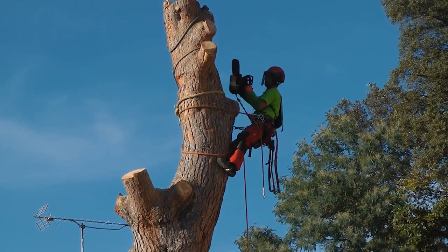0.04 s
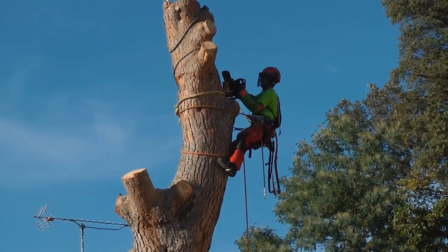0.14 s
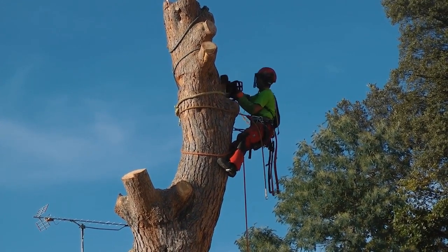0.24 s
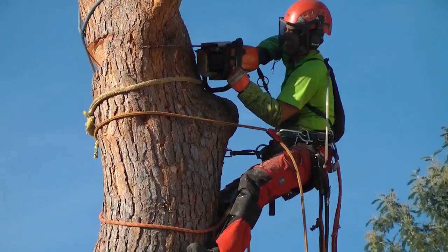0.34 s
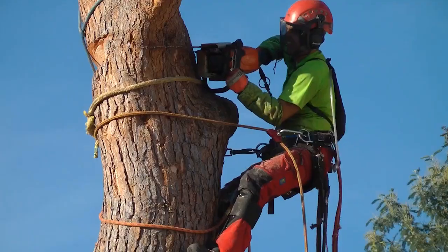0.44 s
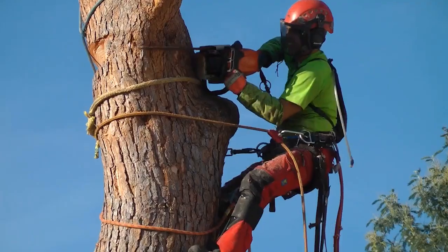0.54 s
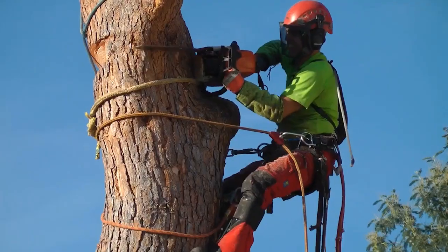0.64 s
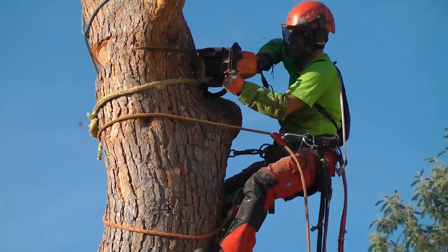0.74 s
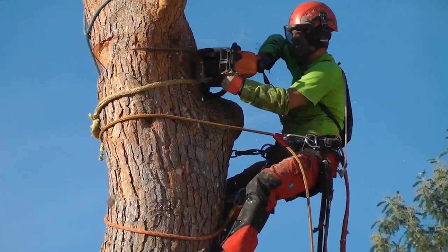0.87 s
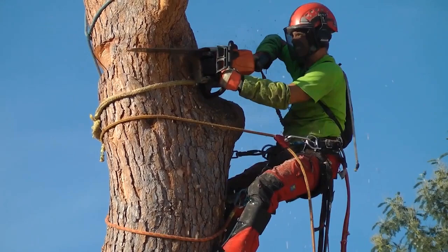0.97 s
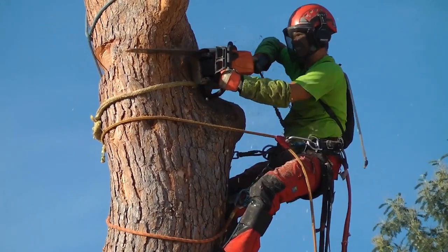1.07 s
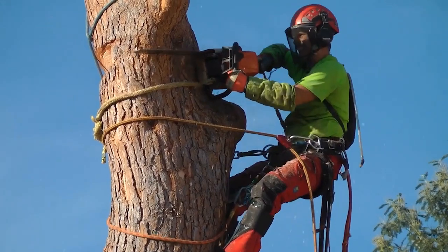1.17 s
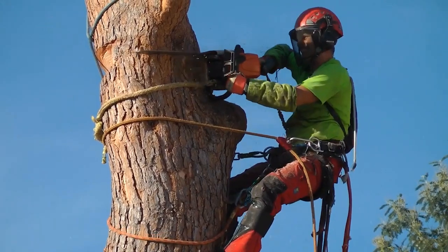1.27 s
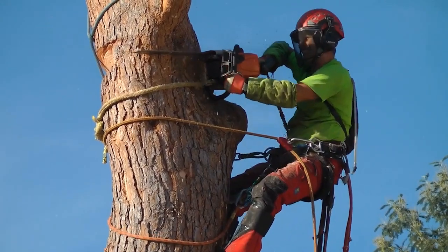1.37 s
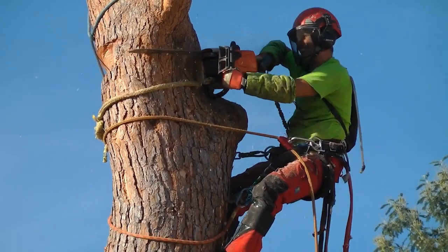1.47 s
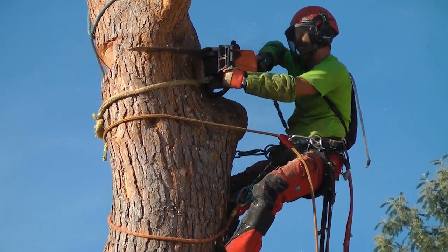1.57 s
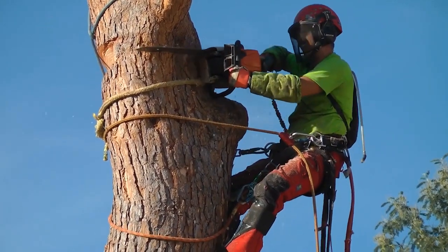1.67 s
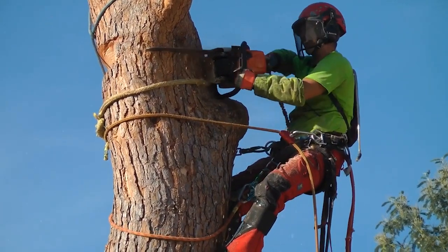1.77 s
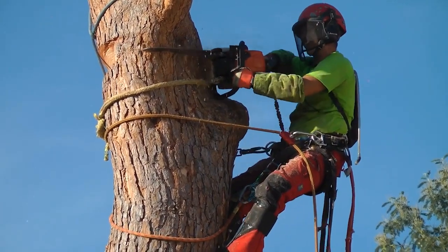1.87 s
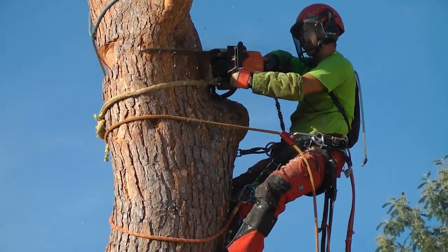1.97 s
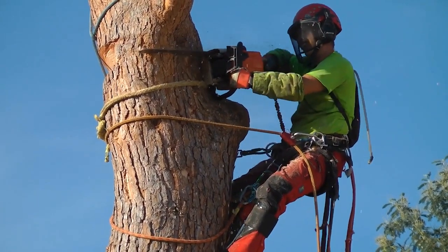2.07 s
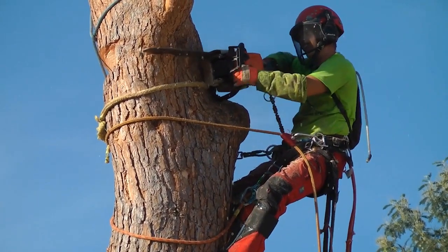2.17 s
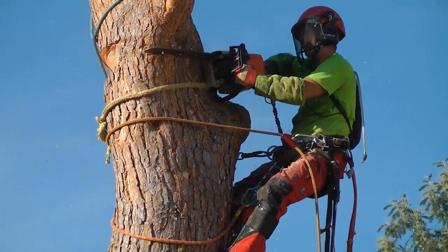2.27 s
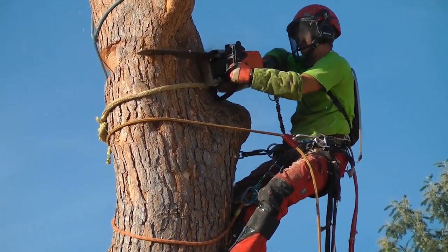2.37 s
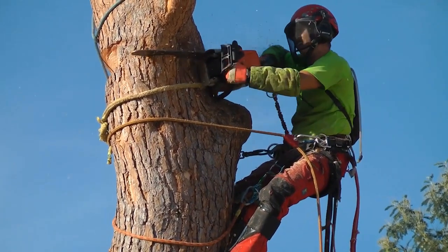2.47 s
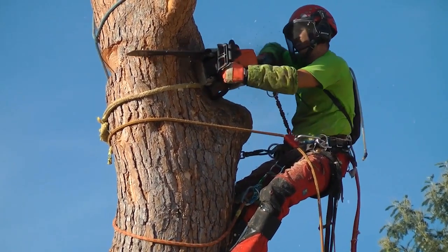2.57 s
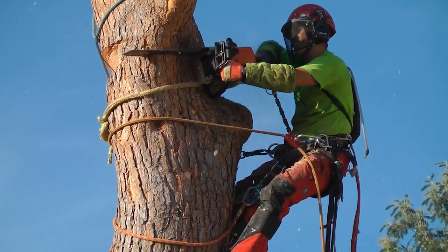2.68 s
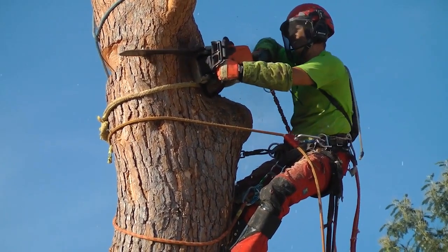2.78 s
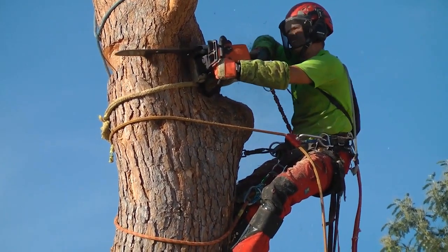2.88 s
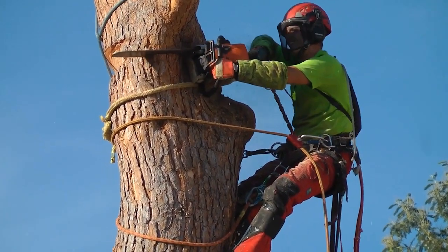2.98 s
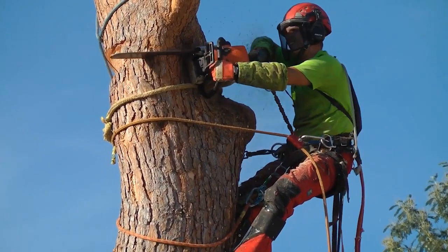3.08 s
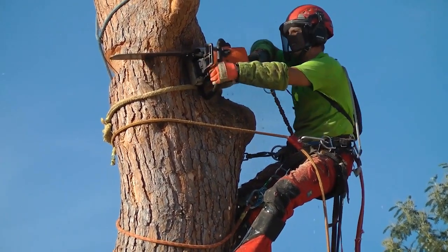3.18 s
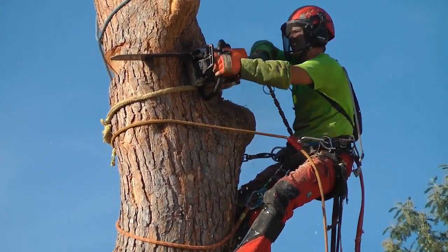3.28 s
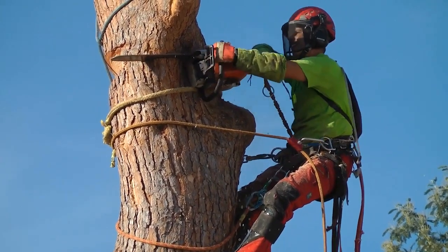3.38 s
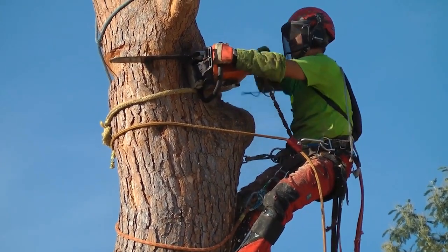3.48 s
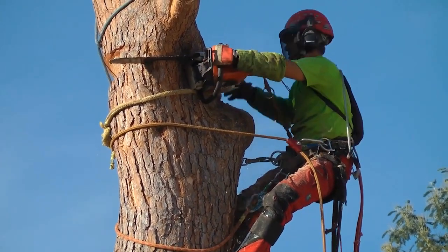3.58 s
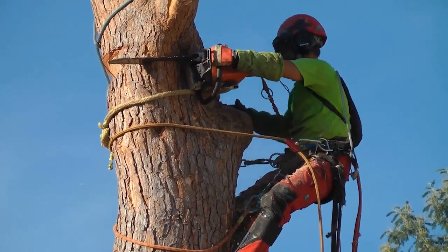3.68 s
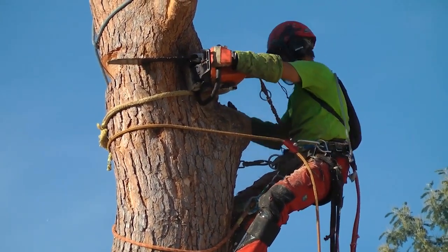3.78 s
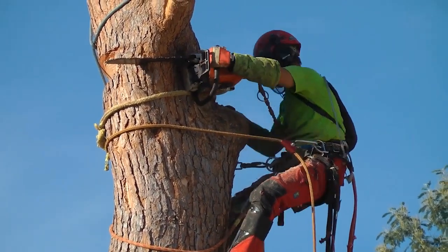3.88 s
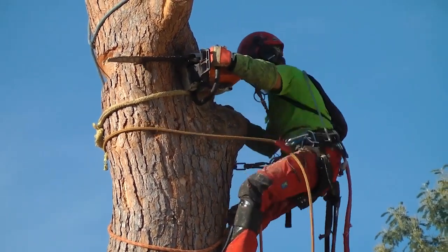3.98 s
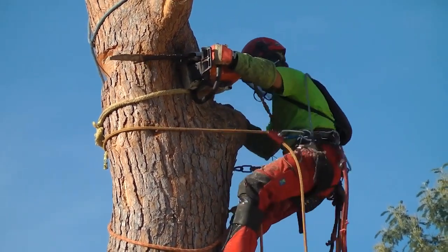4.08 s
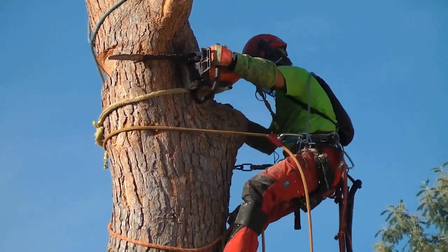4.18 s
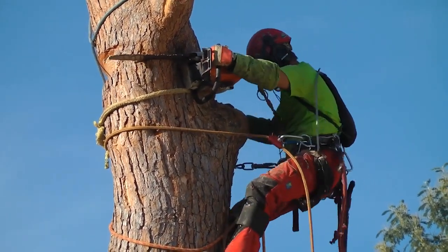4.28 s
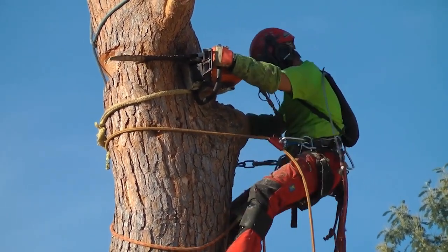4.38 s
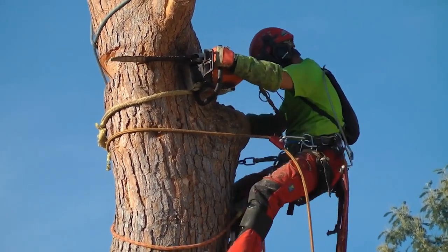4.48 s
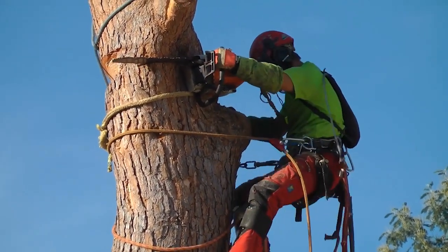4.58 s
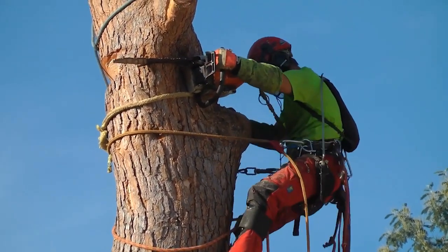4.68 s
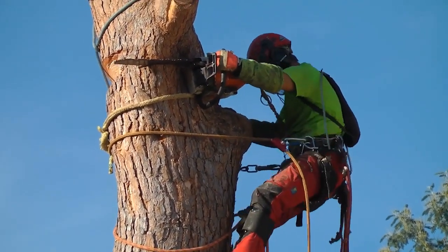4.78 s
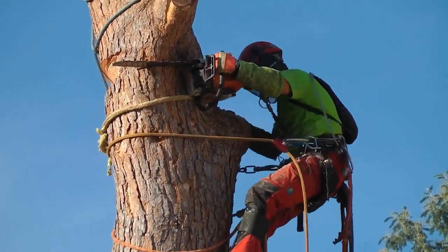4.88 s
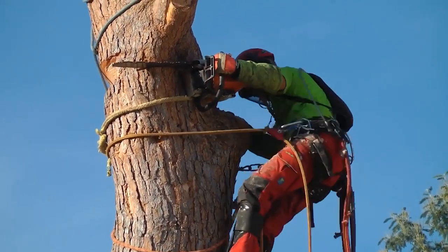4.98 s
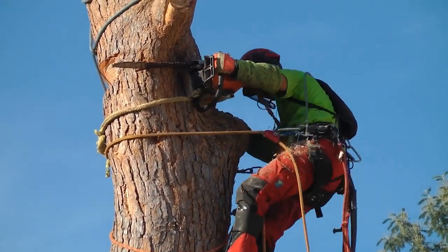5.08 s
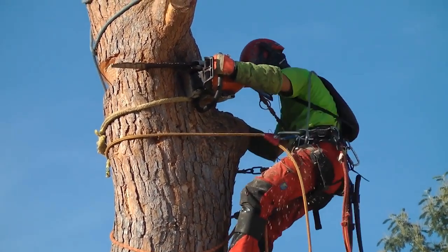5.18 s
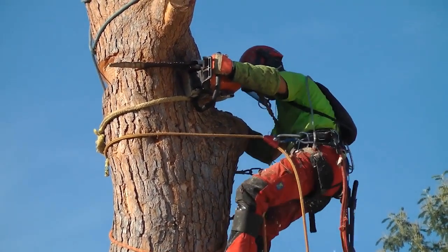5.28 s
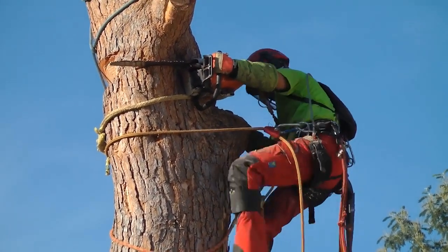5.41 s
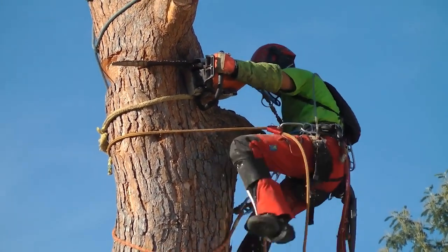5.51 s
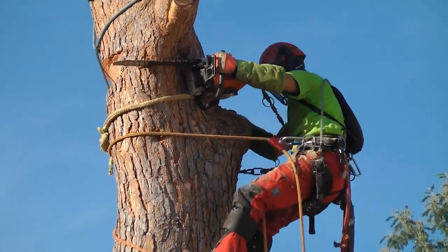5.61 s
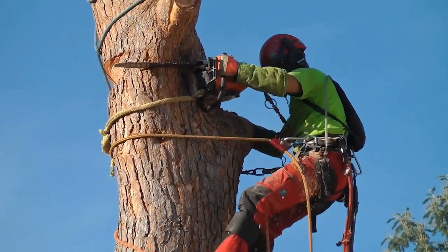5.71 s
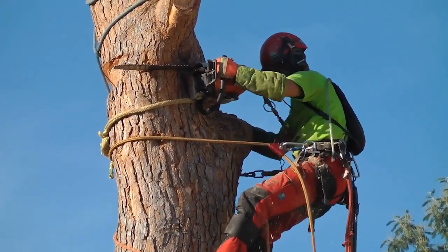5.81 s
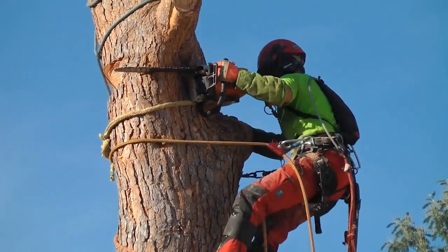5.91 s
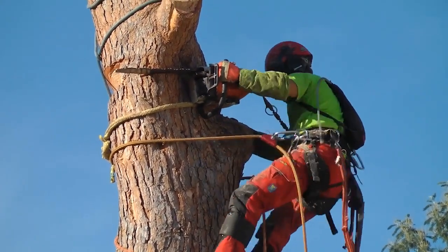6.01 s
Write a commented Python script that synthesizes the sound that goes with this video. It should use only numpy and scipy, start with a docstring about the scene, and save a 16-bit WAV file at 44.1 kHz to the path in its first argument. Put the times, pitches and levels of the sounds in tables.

```python
"""High on a pine trunk, outdoors, a two-stroke chainsaw is heard from some way off. It idles and the sound
steps up abruptly in level; then the saw is opened up and cuts at full throttle, sagging as the chain bites; the
trigger is eased once. Then it coasts down, chain whirring, to a rattling, uneven idle. One crankshaft times it
all: pops and hums are filtered by the muffler, clatter is noise that rings the steel, the whine is crank
multiples sliding through resonances; clinks, echoes, air and a low rumble complete the place."""
import sys
import numpy as np
from scipy import signal
from scipy.fft import irfft
from scipy.io import wavfile
from scipy.ndimage import uniform_filter1d, map_coordinates

SR = 44100
rng = np.random.default_rng(int(sys.argv[2]) if len(sys.argv) > 2 else 0)


def persist_wave(psi):
    """Save psi, clipped to +-1, as 16-bit WAV."""
    counts = np.round(np.clip(psi, -1, 1) * 32767).astype(np.int16)
    wavfile.write(sys.argv[1], SR, np.atleast_2d(counts).T)


N = 266805
TIME = np.arange(N) / SR
TAPS = 4096  # length of the filters that give a body its colour
BINS = np.fft.rfftfreq(TAPS, 1 / SR)

IDLE_HZ, FULL_HZ = 95.63, 400  # reference crank speeds, turns per second: idle and full speed
OPEN_S = 0.667  # first firing under power


def amp(db):
    """Decibels to gain."""
    return 10 ** (np.asarray(db) / 20)


def unit(x):
    """Scales to rms 1."""
    return x / np.sqrt(np.mean(x ** 2) + 1e-20)


def steady(x, size=4000):
    """Scales to a running rms of 1."""
    power = uniform_filter1d(uniform_filter1d(x ** 2, size), size)
    return x / np.sqrt(abs(power) + 1e-12)


def shape(points, hz=BINS):
    """A spectrum in dB, joined on a log-frequency axis."""
    f, db = np.transpose(points)
    return np.interp(np.log(hz + 1), np.log(f), db)


def wander(rate):
    """Slow random motion of rms 1, with this many random knots a second."""
    knots = rng.standard_normal(4096)
    coarse = map_coordinates(knots, [TIME[::64] * rate], order=3, mode="wrap")
    return unit(coarse)[np.arange(N) // 64]


def causal(db):
    """Complex minimum-phase response of a passive body with this gain."""
    log_gain = np.log(amp(db))
    mirrored = np.r_[log_gain, log_gain[-2:0:-1]]
    return np.exp(np.conj(signal.hilbert(mirrored)))[:len(db)]


def colour(x, db):
    """Passes x through such a body."""
    return signal.oaconvolve(x, irfft(causal(db)))[:N]


def peak(hz, centre, width):
    """A resonance curve of height 1."""
    return 1 / (1 + (2 * (hz - centre) / width) ** 2)


def resonate(x, hz, width):
    """A resonance of gain 1 that follows the curve hz."""
    turn = np.exp(2j * np.pi * np.cumsum(hz) / SR)
    r = np.exp(-np.pi * width / SR)
    return 2 * (turn * signal.lfilter([1 - r], [1, -r], x / turn + 1e-18)).real


def at_speed(table, speed, axis):
    """One column of a table laid out by crank speed."""
    table = np.asarray(table, float)
    return np.interp(speed, table[:, 0], table[:, axis])


def ramp(start, length):
    """Rises from 0 to 1 and stays there."""
    return np.clip((TIME - start) / length, 0, 1)


def strikes(turns, spread):
    """One click at each whole turn, of random strength, placed between samples."""
    at = np.flatnonzero(np.diff(np.floor(turns)) > 0)
    late = (np.ceil(turns[at]) - turns[at]) / (turns[at + 1] - turns[at])
    size = np.exp(spread * np.clip(rng.standard_normal(N)[:len(at)], -3, 1.6))
    return np.bincount(at, size * (1 - late), N) + np.bincount(at + 1, size * late, N)


# crankshaft speed while the saw is worked, one firing a turn: (time [s], speed [turns/s])
WORKED_SPEED = [(0.68, 121.7), (0.7, 131.1), (0.77, 133.7), (0.78, 135.5), (0.87, 208.4), (0.91, 236.1),
                (0.95, 264), (1.003, 295), (1.086, 327), (1.213, 352), (1.31, 396), (1.345, 399),
                (1.48, 374), (1.57, 384), (1.64, 382), (1.703, 388), (1.794, 414), (1.85, 419),
                (1.874, 400), (1.896, 359), (1.937, 316), (2.005, 338), (2.068, 340), (2.242, 378),
                (2.31, 410), (2.355, 422), (2.46, 423), (2.528, 417), (2.583, 389), (2.633, 383),
                (2.694, 389), (2.783, 387), (2.826, 396), (2.944, 404), (3.022, 398), (3.136, 398),
                (3.171, 391), (3.24, 363)]
# the idle sags and recovers: (time [s], speed [turns/s])
IDLE_SPEED = [(3.9, 96), (4.15, 96.3), (4.4, 95), (4.57, 92.8), (4.8, 95.4), (5.0, 93.8), (5.2, 96.2),
              (5.5, 95), (5.7, 93), (6.0, 95.3)]


def crank_speed(coast_s=0.34):
    """Idle, the worked stretch, then a run-down by friction until the idle gently catches it."""
    times, hz = np.transpose([(OPEN_S, IDLE_HZ)] + list(WORKED_SPEED))
    worked = np.interp(TIME, times, hz)
    run_down = hz[-1] * np.exp(-np.maximum(TIME - times[-1], 0) / coast_s)
    idle = np.interp(TIME, *np.transpose(IDLE_SPEED))
    caught = (run_down ** 3.5 + idle ** 3.5) ** (1 / 3.5)  # a soft maximum
    return uniform_filter1d(np.where(TIME < times[-1], worked, caught), size=600)


# pulls of the trigger: (pressed [s], let go [s], time to open [s])
TRIGGER_PULLS = [(.663, 1.848, .006), (1.922, 3.23, .018)]


def throttle(shut_s):
    """A share 0-1 that opens with each pull and dies away after it with time constant shut_s."""
    return sum(ramp(pressed, rise) * np.exp(-np.maximum(TIME - let_go, 0) / shut_s)
               for pressed, let_go, rise in TRIGGER_PULLS)


# the level steps up abruptly: (time [s], step of the clatter [dB], step of the pops and chugs [dB])
LEVEL_JUMP = (0.425, 3.18, 7.64)


def jump_gain(db):
    """Gain in two steps: 1.5 times db below full at first, half of db below after the jump."""
    return amp(-db * (1.5 - ramp(LEVEL_JUMP[0], 0.025)))


# the muffler blown hard: (frequency [Hz], level [dB])
MUFFLER_HARD = [(60, -19), (130, -5), (240, 0.5), (290, 3.5), (335, -2), (385, -14.5), (425, -4),
                (490, 5.5), (640, 0.5), (800, 1), (1000, 6), (1200, 7), (1400, 10.5), (1475, 3.5),
                (1550, 14), (1620, 9.5), (1695, 6), (1780, -10.5), (2100, -25), (2700, -7), (4500, -27.5)]
# exhaust note, throttle open: (crank speed [turns/s], level [dB], brightness [dB/octave])
EXHAUST_NOTE = [(100, -33.5, 4), (131, -28, 2.5), (199, -26.5, 2.5), (272, -25.5, -2), (294, -28, 3.5),
                (334, -25.5, -13.5), (346, -25.5, -6.5), (390, -28.5, -8), (394, -26, -5.5),
                (423, -27, -3.5)]
# the note's middle is full in the first slow putts, hollow as it winds up: (crank speed [turns/s], lift [dB])
HOLLOW_MIDDLE = [(135, 5), (150, 0), (175, -8), (240, -9), (280, 0)]
HOLLOW_HZ, HOLLOW_WIDTH_HZ = 800, 190  # the band that this acts on
LIMP_AT_S = 2.83  # from here the saw runs lighter, and strong and weak firings alternate
LIGHT_DB_PER_OCTAVE = 1  # the lighter note brightens by this


def exhaust(turns, speed, gas, flutter=0.045, sputter=0.15, waver_db=1.8, lag_s_per_hz=1e-6,
            stumble=0.02, blast=0.1, limp=0.1):
    """Firings through the muffler: ragged and gassy at low speed, a clean stack at high speed."""
    # the treble leaves the muffler later than the bass, so each pop is a tiny upward chirp
    response = causal(shape(MUFFLER_HARD)) * np.exp(-1j * np.pi * lag_s_per_hz * BINS ** 2)
    bright_db = at_speed(EXHAUST_NOTE, speed, axis=2) + LIGHT_DB_PER_OCTAVE * ramp(LIMP_AT_S, 0.071)
    hollow_db = at_speed(HOLLOW_MIDDLE, speed, axis=1)
    slow = (IDLE_HZ / speed) ** 2  # slow firings differ more, in strength and in timing
    fired = turns + stumble * slow * wander(130)
    out, power = np.zeros(N), np.zeros(N)
    for k in np.arange(1, 21):  # crank multiples
        hz = k * speed
        tilt_db = bright_db * np.log2(np.maximum(hz, 650) / 1000)
        # a soft pop has little bass too
        thin_db = np.minimum(bright_db, 0) * np.log2(np.maximum(390 / hz, 1)) * 2.1
        middle_db = hollow_db * np.exp(-((hz - HOLLOW_HZ) / HOLLOW_WIDTH_HZ) ** 2)
        gain = amp(tilt_db + thin_db + middle_db + waver_db * wander(23.91))
        part = np.interp(hz, BINS, response) * gain
        out += (part * np.exp(2j * np.pi * k * fired)).real
        power += abs(part) ** 2 / 2
    gusts = np.exp(-(fired % 1) / 0.25) * rng.standard_normal(N)  # time constant a quarter turn
    puffs = steady(colour(gusts, shape(MUFFLER_HARD)))
    pops = out / np.sqrt(uniform_filter1d(power, size=1500)) + blast * slow ** 1.5 * puffs
    alternation = limp * ramp(LIMP_AT_S, 0.046) * np.cos(np.pi * turns)
    uneven = 1 + (flutter + sputter * slow) * wander(250) + alternation
    return pops * uneven * gas * amp(at_speed(EXHAUST_NOTE, speed, axis=1))


# the engine running on, throttle shut: (crank speed [turns/s], level [dB])
COAST_LEVEL = [(96.5, -65.5), (100, -50), (108, -41), (125, -39), (170, -33), (240, -36), (314, -35.5),
               (365, -31)]
# make-up of that hum, a row for each crank multiple from the 1st to the 9th:
# (level while fast [dB], level while slow [dB])
COAST_MULTIPLES = [(0, -6), (-3, -5), (0, -13), (-6, 1), (-7, -2), (-9, -7), (-8, -10), (-12, -14),
                   (-14, -15)]
# the muffler's colour on that hum: (frequency [Hz], level [dB])
COAST_MUFFLER = [(100, -33), (200, -11), (300, -3.5), (450, -5.5), (580, -2), (720, -4.5), (950, 5),
                 (1150, -2), (1400, 9), (1750, 2), (2400, 12.5), (3300, -1)]
COAST_SLOW_HZ, COAST_FAST_HZ = 165, 250  # crank speeds at which the two columns of the make-up hold


def coasting_hum(turns, speed, gas, waver_db=2.4, flutter=0.15):
    """With the throttle shut the piston only pumps air: a few low multiples glide down to idle."""
    hum = np.zeros(N)
    for k, (fast_db, slow_db) in enumerate(COAST_MULTIPLES, 1):
        mix_db = np.interp(speed, [COAST_SLOW_HZ, COAST_FAST_HZ], [slow_db, fast_db])
        gain = amp(mix_db + shape(COAST_MUFFLER, k * speed) + waver_db * wander(23.95))
        hum += gain * np.cos(2 * np.pi * (k * turns + rng.random()))
    level = (1 - gas) * amp(at_speed(COAST_LEVEL, speed, axis=1))
    return steady(hum) * (1 + flutter * wander(120)) * level


# the muffler blown softly: (frequency [Hz], level [dB])
MUFFLER_SOFT = [(40, -41), (100, -35.5), (165, -54), (215, -20), (275, -12.5), (350, -15.5), (480, 2.5),
                (650, 1.5), (780, -1), (930, 5), (1160, -5.5), (1330, -12), (2500, -36.5), (5000, -60)]
POPS_DB, POPS_UNEVEN = -37, 0.056  # level before the jump gain; share 0-1 that fires unevenly
POPS_BELOW_HZ, POPS_FADE_DB_PER_HZ = 132, 0.5  # they die out above this crank speed
BITE_AT_S, BITE_S = 1, 0.75  # the bar sinks into the wood: when, and for how long
BOOM_FREE_HZ, BOOM_CUT_HZ = 570, 669  # boom of the idling saw in the open and in the cut


def idle_pops(turns, speed, gas, puff=0.45, intake_lag=0.5193, boom=0.8, boom_width_hz=70):
    """Throttle shut, every turn pops weakly; half a turn later the intake gulps; a boom rings on between."""
    pops = (1 - POPS_UNEVEN) * strikes(turns, spread=0.12) + POPS_UNEVEN * strikes(turns, spread=0.58)
    fumes = signal.lfilter([1], [1, -np.exp(-1 / (0.0033 * SR))], pops) * rng.standard_normal(N)
    intake_db = shape([(200, 19.0), (650, -5.5), (900, -11.0), (1300, 5.5), (4000, 5.0)])
    gulps = colour(unit(strikes(turns - intake_lag, spread=0.14)), intake_db)
    body = colour(unit(pops) + puff * unit(fumes) + gulps, shape(MUFFLER_SOFT))
    boom_hz = BOOM_FREE_HZ + (BOOM_CUT_HZ - BOOM_FREE_HZ) * ramp(BITE_AT_S, BITE_S)
    booming = steady(resonate(body, boom_hz, boom_width_hz))
    fade_db = POPS_FADE_DB_PER_HZ * np.maximum(speed - POPS_BELOW_HZ, 0)
    level = (1 - gas) * amp(POPS_DB - fade_db) * jump_gain(LEVEL_JUMP[2])
    return steady(steady(body) + boom * booming) * level


# single burns as the engine catches itself at the end of the run-down:
# (time [s], level before the common lift late_db [dB])
CATCHING_BURNS = [(3.591, -26.5), (3.628, -28.5), (3.67, -29), (3.704, -29), (3.758, -28.5), (3.804, -30),
                  (3.832, -29), (3.86, -28), (3.937, -28)]
# colour of one such burn: (frequency [Hz], level [dB])
BURN_COLOUR = [(100, -28.5), (200, -14), (270, -2), (400, -6), (650, -3), (900, 2), (1150, 3), (1350, -10),
               (2500, -22), (6000, -22)]
# spacing of proper burns at idle, drawn at random: one column (gap [turns])
BURN_GAPS = [1, 1, 2, 2, 3, 3, 3, 3, 3, 4]


def chugs(turns, gas, idle_db=-12, late_db=18, spread=0.23, fumes=0.17):
    """Off the throttle only every third turn or so burns properly: separate late burns, then a loping putter."""
    whole = np.flatnonzero(np.diff(np.floor(turns)) > 0)
    picks = np.cumsum(rng.choice(BURN_GAPS, len(whole)))
    at = whole[picks[picks < len(whole)]]
    idling = (TIME < OPEN_S) | (TIME > CATCHING_BURNS[-1][0] + 0.02)
    burns = np.bincount(at, np.exp(spread * rng.standard_normal(len(at))), N)
    burns = burns * idling * amp(idle_db) * jump_gain(LEVEL_JUMP[2])
    for s, db in CATCHING_BURNS:
        burns[round(s * SR)] += amp(db + late_db)
    keep = np.exp(-1 / (0.0051 * SR))
    hiss = signal.lfilter([np.sqrt(1 - keep ** 2)], [1, -keep], burns) * rng.standard_normal(N)
    burn_db = shape(BURN_COLOUR)
    body_db = burn_db - 10 * np.log10(np.mean(amp(burn_db) ** 2))  # mean power 1
    return colour(burns + fumes * hiss, body_db) * (1 - gas)


# ringing of the bar and clutch drum: (frequency [Hz], width [Hz], lift at speed [dB],
# lift idling in the cut [dB], lift idling in the air [dB])
STEEL_RINGS = [(3470, 13, 9.5, 6, 10), (4122, 99, 12.5, 14, 10), (5130, 180, 5, 3.5, 10.5),
               (5460, 260, 5.5, 9, 3), (6172, 170, 11, 16.5, 7), (6540, 150, 7, 4, 7),
               (7640, 580, 5.5, 6.5, 11), (8400, 110, 1.5, 6, 3), (10730, 810, 6, 2.5, 9),
               (11680, 250, 9.5, 14, 14.5), (13400, 210, 5, -10, 11), (15700, 400, 6, 5, 8)]


def rings(axis):
    """The lift in dB that the ringing steel gives."""
    return sum(row[axis] * peak(BINS, row[0], row[1]) for row in STEEL_RINGS)


# broad colour of the clatter at full speed: (frequency [Hz], density [dB per Hz])
CLATTER_FAST = [(60, -29), (170, -46), (300, -23), (600, -22), (900, -10), (1300, -1.5), (2300, 0),
                (2900, -7), (3500, -1), (5000, -4.5), (7000, -1), (9500, -3), (11500, -7), (13000, -5),
                (16000, -11.5)]
# broad colour of the clatter at idle: (frequency [Hz], density [dB per Hz])
CLATTER_SLOW = [(60, -26.5), (160, -10.5), (260, 2), (600, 3.5), (1100, 2), (1700, -2), (2300, 0.5),
                (2800, -1.5), (3500, 1), (5000, 0), (7000, -3.5), (9500, -3), (11500, -11), (13000, -9),
                (16000, -15)]
# a bright ring of the free bar, heard only after the level jump; level before the mix
SIZZLE_HZ, SIZZLE_WIDTH_HZ, SIZZLE_DB = 8000, 300, -11


def clatter(turns, fast, slap_s=0.0067, wash=1.0, tick=0.14, link=0.2):
    """The piston slaps once a turn and shakes the chain; links tick on the bar; all of it rings the steel."""
    slaps = strikes(turns, spread=0.5)
    shake = unit(signal.lfilter([1], [1, -np.exp(-1 / (slap_s * SR))], slaps))
    rattle = steady((steady(shake) + wash + fast) * rng.standard_normal(N))
    # 600 link ticks a second on average, 2100 when fast
    links = rng.uniform(-0.43, 1, N) * (rng.random(N) < (600 + 1500 * fast) / SR)
    drive = rattle + tick * steady(strikes(turns - 0.1, spread=0.11)) + link * steady(links)
    racing = steady(colour(drive, shape(CLATTER_FAST) + rings(axis=2)))
    resting = steady(colour(drive, shape(CLATTER_SLOW) + rings(axis=3)))
    free = steady(colour(drive, shape(CLATTER_SLOW) + rings(axis=4)))
    sizzle = resonate(free, np.full(N, SIZZLE_HZ), SIZZLE_WIDTH_HZ)
    free = free + amp(SIZZLE_DB) * ramp(LEVEL_JUMP[0], 0.02) * sizzle
    contact = ramp(BITE_AT_S, BITE_S)
    idling = contact * resting + (1 - contact) * free
    return np.sqrt(fast) * racing * amp(-0.33) + np.sqrt(1 - fast) * idling


# the chain chatters in the kerf while the trigger is eased:
# (time [s], half-length down to 1/e of the lift [s], lift [dB])
KERF_CHATTER = (1.885, 0.051, 3.3)
CLATTER_DB, CLATTER_DB_PER_OCTAVE = -34, 4  # level at idle before the jump gain, and growth with speed
LOAD_DB = 1.62  # lift with the throttle open
SLACK_DB, SLACK_HZ, SLACK_OCTAVES = 3, 126, 0.68  # the loose chain rattles more around one crank speed


def clatter_level(speed, load):
    """The steel gets louder with speed and load, and again while the chain coasts slack."""
    near_speed = np.exp(-(np.log2(speed / SLACK_HZ) / SLACK_OCTAVES) ** 2)
    slack = (1 - load) * near_speed * np.clip((speed - IDLE_HZ) / 4, 0, 1)
    at_s, half_s, lift_db = KERF_CHATTER
    chatter_db = lift_db * np.exp(-((TIME - at_s) / half_s) ** 2)
    speed_db = CLATTER_DB_PER_OCTAVE * np.log2(speed / IDLE_HZ)
    level_db = CLATTER_DB + speed_db + LOAD_DB * load + SLACK_DB * slack + chatter_db
    return amp(level_db) * jump_gain(LEVEL_JUMP[1])


# how the rasp dulls while the chain runs fast without load: (frequency [Hz], gain [dB])
UNLOADED_COLOUR = [(2500, 3), (7000, 2.5), (12000, -2.5)]
# the slack chain rattles thinly, without body: (frequency [Hz], gain [dB])
SLACK_COLOUR = [(250, -8), (700, -6), (1500, 0), (12000, 0.5)]


def slacken(steel, speed, load, chain_runs):
    """Without load the running chain loses its edge and its body."""
    unloaded = chain_runs * (1 - load)
    steel = (1 - unloaded) * steel + unloaded * colour(steel, shape(UNLOADED_COLOUR))
    slack = np.clip((speed - 100) / 15, 0, 1) * (1 - load)
    return (1 - slack) * steel + slack * colour(steel, shape(SLACK_COLOUR))


# broad colour of the housing's whine under load: (frequency [Hz], level of a crank multiple there [dB])
WHINE_COLOUR = [(1700, -28.5), (2100, -41.5), (2600, -42), (3300, -45.5), (4700, -44), (5800, -56),
                (7500, -40.5), (8500, -52), (10500, -47), (12000, -46.5), (14500, -64)]
# sharp resonances of bar and housing that sing when a crank multiple meets them:
# (frequency [Hz], width [Hz], level [dB])
SINGING_STEEL = [(2790, 14, -42.5), (4161, 153, -35), (5640, 51, -34), (6164, 280, -31.5), (6350, 66, -39),
                 (6600, 160, -35), (7950, 58, -40.5), (8900, 120, -47), (9110, 99, -38),
                 (10500, 130, -47.5), (10920, 120, -41.5), (11630, 140, -44)]
# multiples that the chain drive shakes more or less than the rest: (crank multiple [1], lift [dB])
WHINE_MULTIPLES = [(7, 2), (12, 4.5), (15, 2), (16, 2), (17, -4), (18, -1.5), (19, -2), (21, 3), (22, -4),
                   (23, 2), (24, 4.5), (26, 1), (27, 3.5), (29, 4), (30, 2), (31, 3)]
WHINE_DB, WHINE_DB_PER_OCTAVE = -1.57, 16.5  # gain of the whine at full speed, and its growth with speed


def whine(turns, speed, waver_db=2.6, shimmer=0.2, blur=0.011):
    """Shaking locks to the crank; each multiple flares as it slides through a sharp resonance of the steel."""
    response = amp(shape(WHINE_COLOUR))
    for hz, width, db in SINGING_STEEL:
        response = response + amp(db) * peak(BINS, hz, width)
    out = np.zeros(N)
    for k in np.arange(5, 37):
        lift_db = dict(WHINE_MULTIPLES).get(k, 0) + waver_db * wander(27.954)
        phase = 2 * np.pi * (k * turns + rng.random()) + blur * k * wander(110)
        out += np.interp(k * speed, BINS, response) * amp(lift_db) * np.cos(phase)
    growth_db = WHINE_DB_PER_OCTAVE * np.log2(speed / FULL_HZ)
    return np.sqrt(2) * out * (1 + shimmer * wander(80)) * amp(WHINE_DB + growth_db)


# resonances that the sprocket's whirr falls through: (frequency [Hz], width [Hz], level [dB])
SPROCKET_RINGS = [(2180, 280, -30.5), (3720, 850, -32.5)]


def sprocket(turns, speed, gas, teeth=7, low_db=-8, slack=0.8):
    """Seven teeth take up the loose chain: a falling whirr at the tooth rate and its octave."""
    tooth = 2 * np.pi * teeth * turns
    octave_hz = 2 * teeth * speed
    octave = np.cos(2 * tooth + slack * wander(220))
    whirr = octave + amp(low_db) * np.cos(tooth + slack * wander(120))
    level = sum(amp(db) * peak(octave_hz, hz, width) for hz, width, db in SPROCKET_RINGS)
    return unit(whirr * (1 + 0.098 * np.cos(2 * np.pi * turns))) * level * (1 - gas)


# clinks of chain and climbing gear: (time [s], level [dB], ring time constant [s])
GEAR_CLINKS = [(0.311, -30, 0.0023), (0.362, -40, 0.0018), (0.452, -37, .003), (0.515, -32, .003),
               (0.554, -26, 0.0016), (0.596, -43, .002), (5.782, -32.5, 0.008)]


def clinks():
    """Small bright ticks of metal: coloured noise under sudden, decaying envelopes."""
    metal_db = shape([(1000, -10), (5000, -15), (8000, -6), (12000, -18), (15000, -25)])
    ring = unit(colour(rng.standard_normal(N), metal_db))
    return ring * sum(amp(db) * (TIME > s) * np.exp(-np.maximum(TIME - s, 0) / ring_s)
                      for s, db, ring_s in GEAR_CLINKS)


# echoes from the ground, walls and trees: (delay [s], level [dB], left-right share [-1 to 1, left positive])
OUTDOOR_ECHOES = [(0.0113, -19.5, 0.29), (0.02, -20.5, 0.26), (.037, -30, -0.36), (.058, -38, -0.1)]


def outdoors(x, scatter_db=-16, t60=0.39):
    """A few distinct echoes, and a thin scatter from the foliage that differs between the ears."""
    t = np.arange(SR // 2) / SR
    decay = amp(-60 * t / t60)
    foliage_db = shape([(100, 0.92), (300, 7.4), (700, 0.84), (1400, 6.6), (2500, 8.2),
                        (6000, 0.13), (16000, 0.087)])
    tails = []
    for _ in "LR":
        tail = np.pad(rng.standard_normal(len(t)) * decay, (0, N - len(t)))
        tails.append(colour(tail, foliage_db)[:len(t)])
    paths = np.array(tails) * amp(scatter_db) / np.sqrt(np.sum(decay ** 2))
    paths -= 0.5 * paths.mean(0)  # it arrives mostly from the sides
    paths[:, 0] += 1  # the direct sound
    for delay, db, side in OUTDOOR_ECHOES:
        paths[:, round(delay * SR)] += amp(db) * np.array([1 + side, 1 - side])
    return signal.oaconvolve(x[None], paths, axes=1)[:, :N]


# colour of the outdoor air: (frequency [Hz], relative density [dB per Hz])
AIR_COLOUR = [(20, -21), (60, -4), (110, 17.5), (250, 13), (600, 20.5), (1500, -34), (5000, -47),
              (16000, -73)]


def background(loudness, air_db=-62, rumble_db=-51.5, swell=1.26):
    """Faint outdoor air, and a low rumble on the right that swells with the saw's clatter."""
    air = np.array([unit(colour(rng.standard_normal(N), shape(AIR_COLOUR))) for _ in "LR"])
    low_db = shape([(20, 2.5), (80, 1.0), (200, 0.0), (500, 0), (1500, -28.0)])
    rumble = unit(colour(rng.standard_normal(N), low_db)) * unit(loudness ** swell)
    return air * amp(air_db) + rumble * amp(rumble_db) * np.array([[0.08], [1]])


def scene():
    """One crankshaft and one throttle drive every part of the saw."""
    speed = crank_speed()
    gas = throttle(shut_s=0.01)
    load = throttle(shut_s=0.022)  # the chain goes slack a little later than the throttle shuts
    fast = np.clip((speed - 100) / 230, 0, 1)
    hunting = (1 - fast) ** 4 * 0.013 * wander(40)  # the idle hunts, full speed is smooth
    turns = np.cumsum(speed * (1 + hunting + 0.001105 * wander(40))) / SR
    turns = turns - turns[round(OPEN_S * SR)]  # a whole turn falls on the first firing under power
    loudness = clatter_level(speed, load)
    chain_runs = np.clip((speed - 100) / 150, 0, 1)  # the clutch takes the chain along
    steel = slacken(loudness * clatter(turns, chain_runs), speed, load, chain_runs)
    singing = (gas + load) / 2 * whine(turns, speed)
    engine = exhaust(turns, speed, gas) + coasting_hum(turns, speed, gas)
    engine = engine + idle_pops(turns, speed, gas) + chugs(turns, gas)
    saw = engine + steel + singing + sprocket(turns, speed, gas)
    return outdoors(saw + clinks()) + background(loudness)


def record(dry, edge_hz=15800):
    """A steep linear-phase low-pass takes off the extreme treble."""
    low_pass = signal.firwin(511, edge_hz, window=("kaiser", 9), fs=SR)
    return signal.oaconvolve(dry, low_pass[None], "same")


dry = scene()
out = record(dry)
persist_wave(out)
```